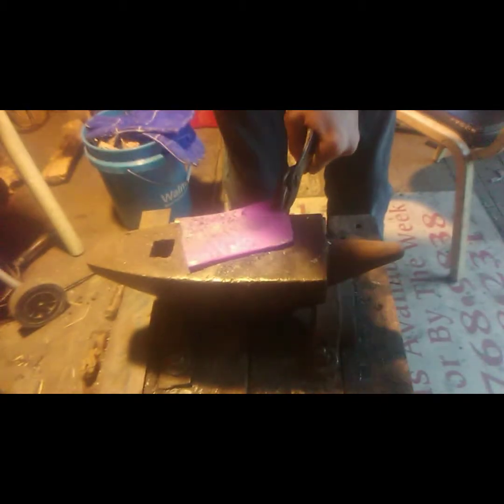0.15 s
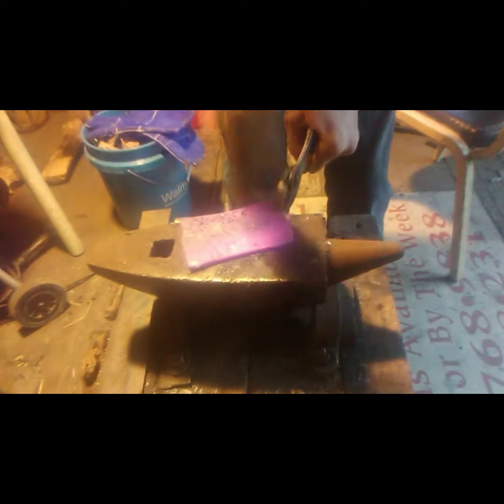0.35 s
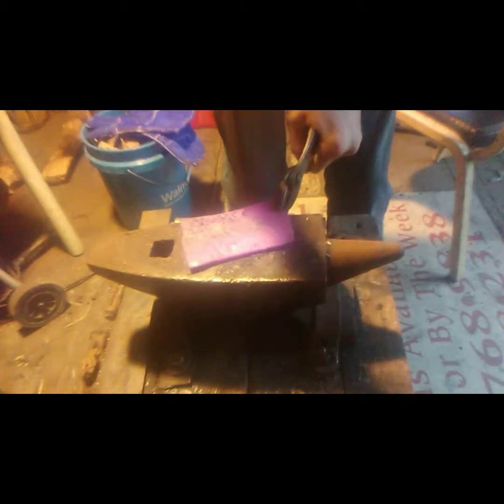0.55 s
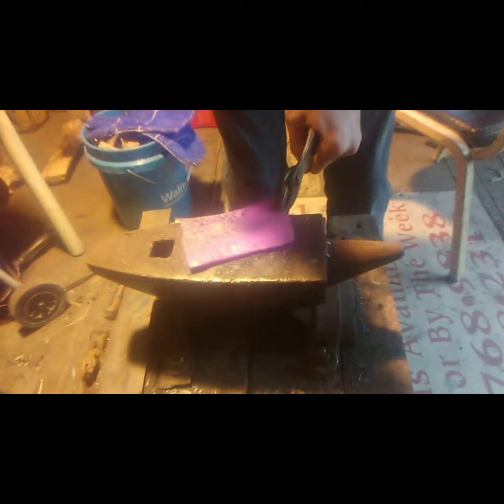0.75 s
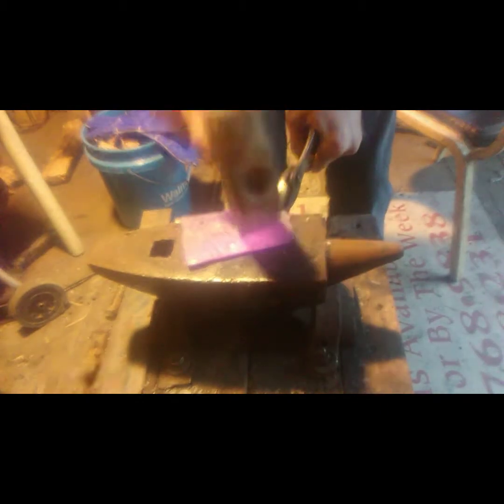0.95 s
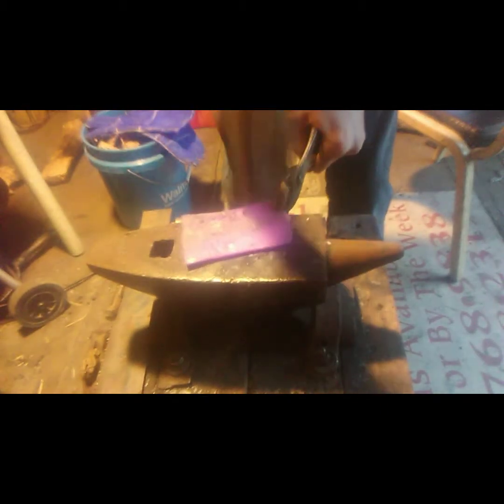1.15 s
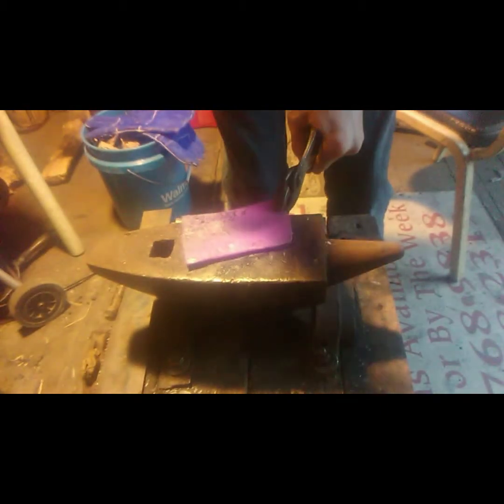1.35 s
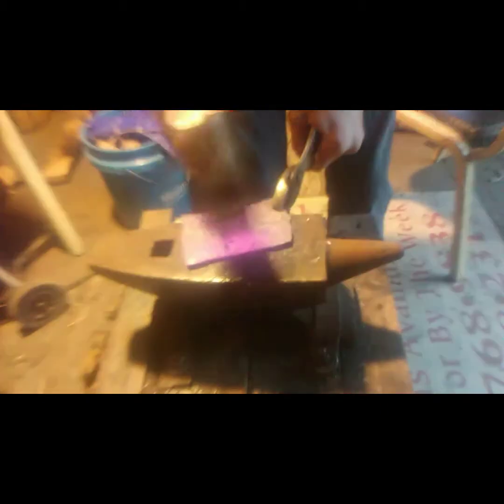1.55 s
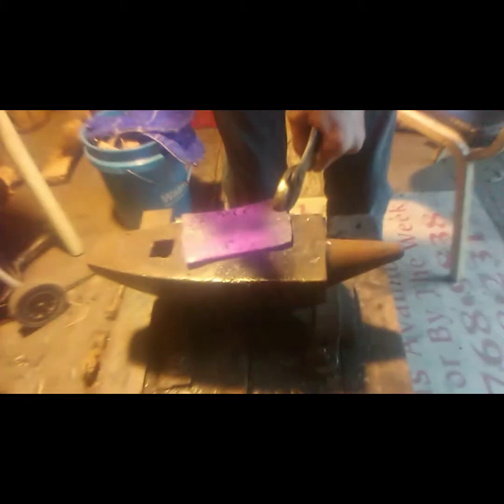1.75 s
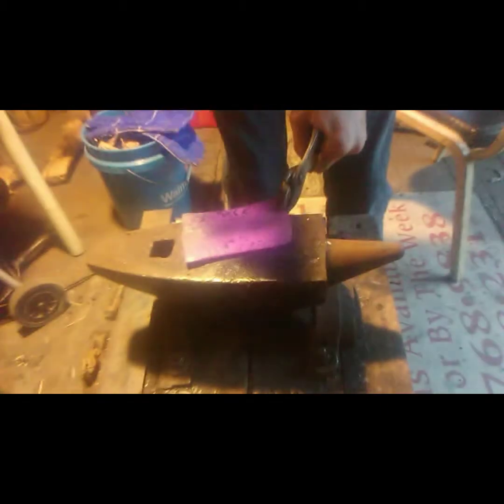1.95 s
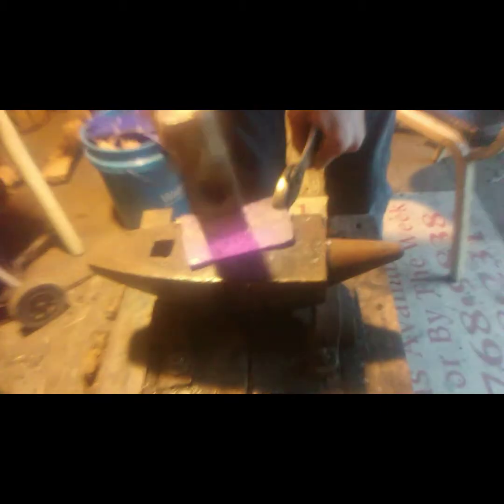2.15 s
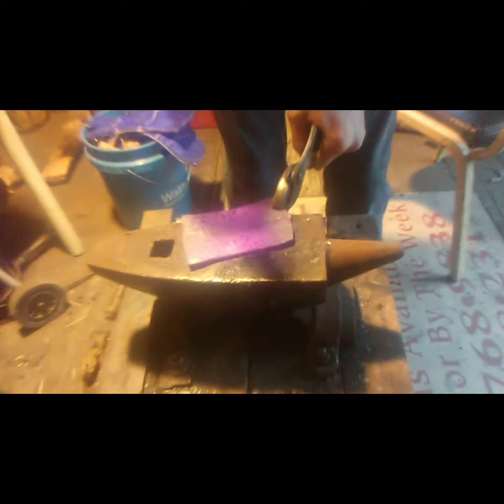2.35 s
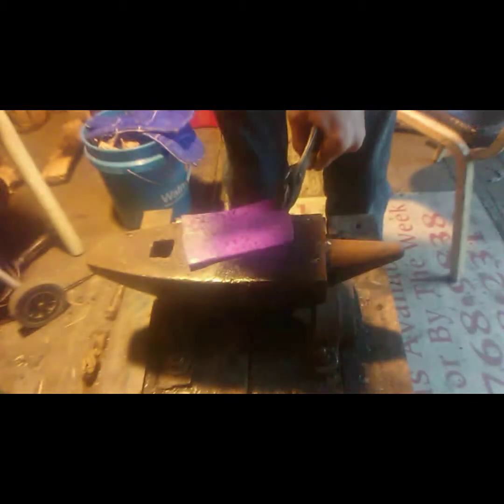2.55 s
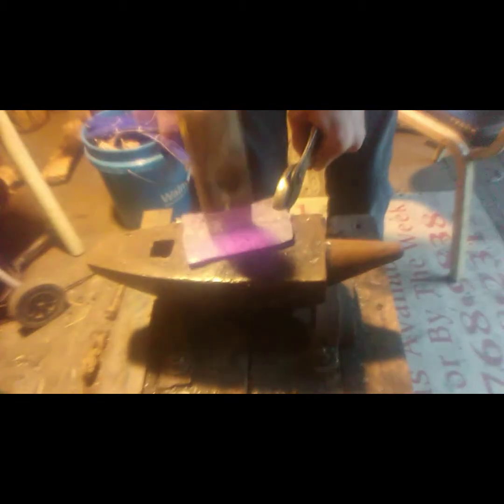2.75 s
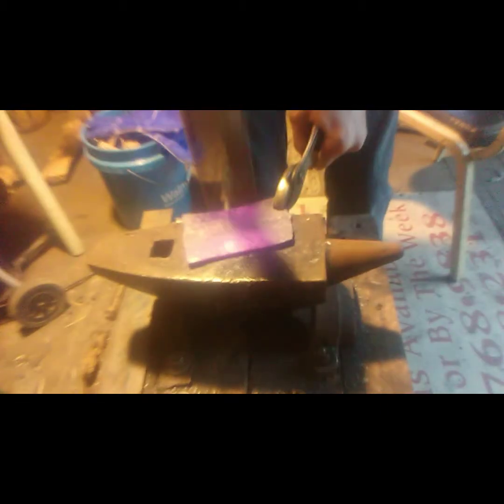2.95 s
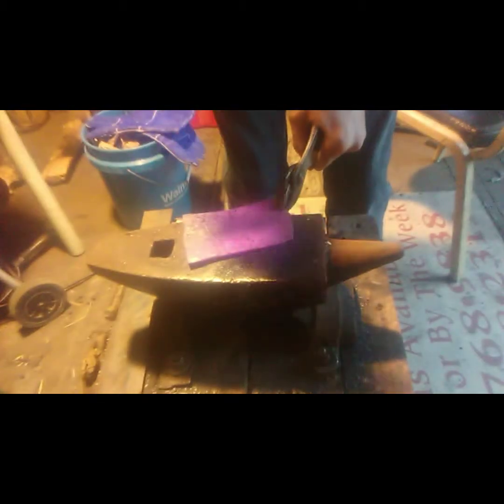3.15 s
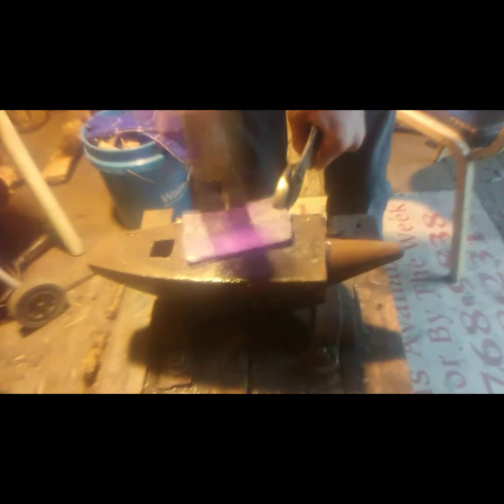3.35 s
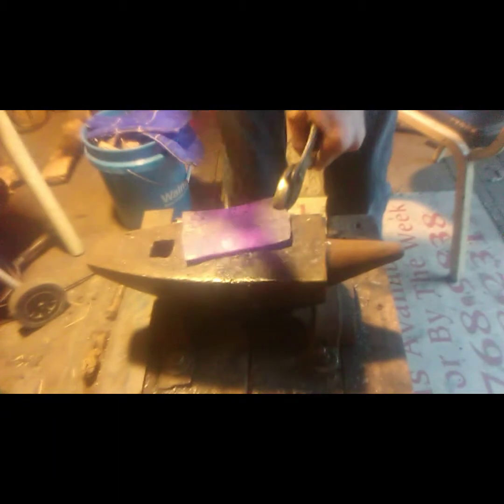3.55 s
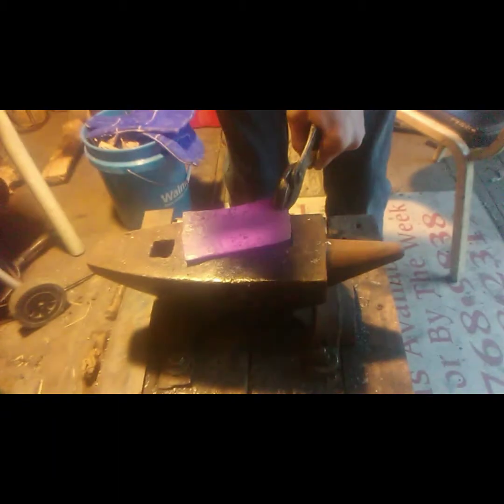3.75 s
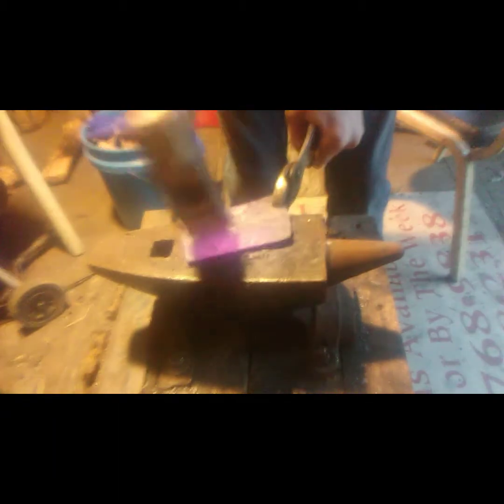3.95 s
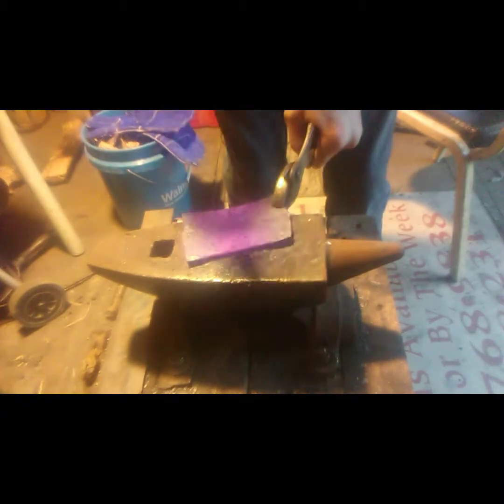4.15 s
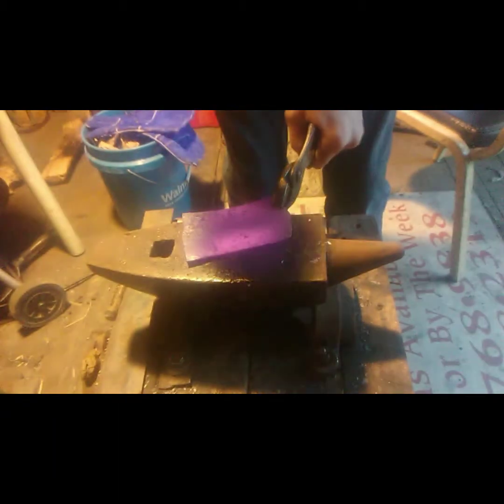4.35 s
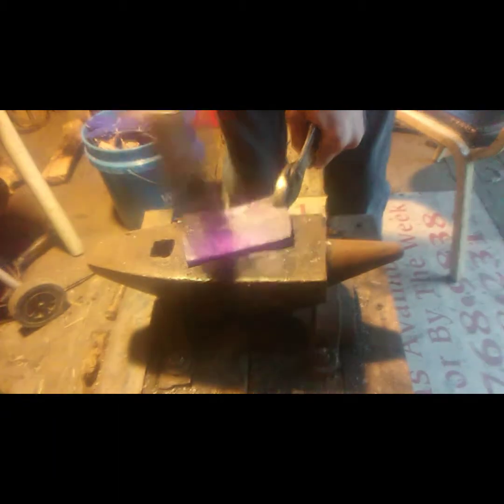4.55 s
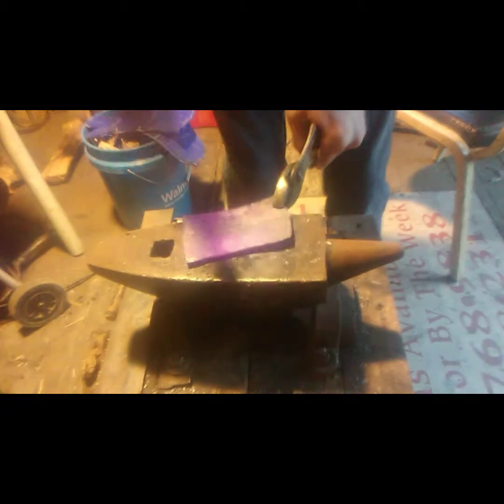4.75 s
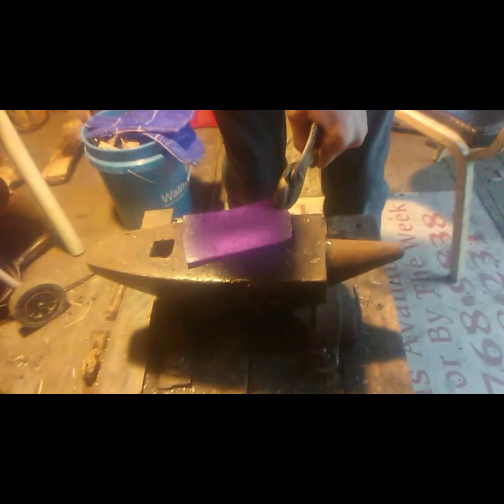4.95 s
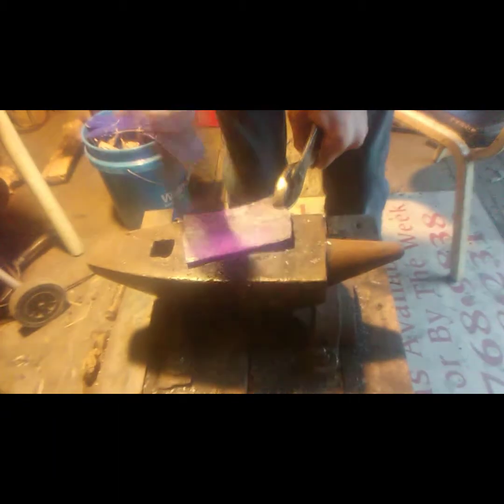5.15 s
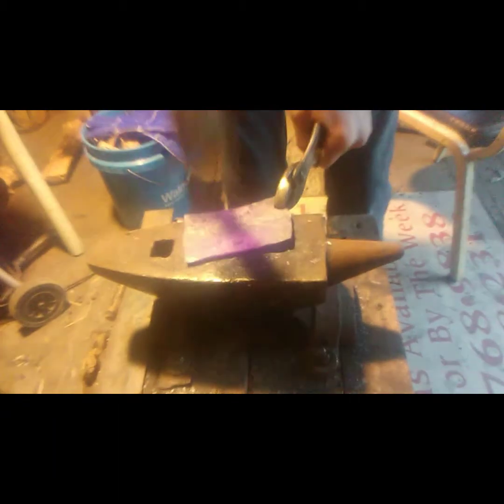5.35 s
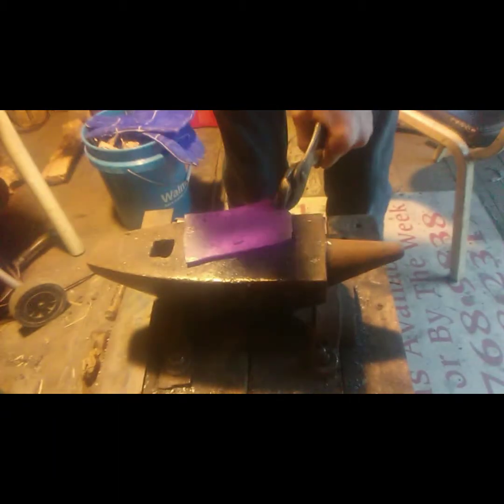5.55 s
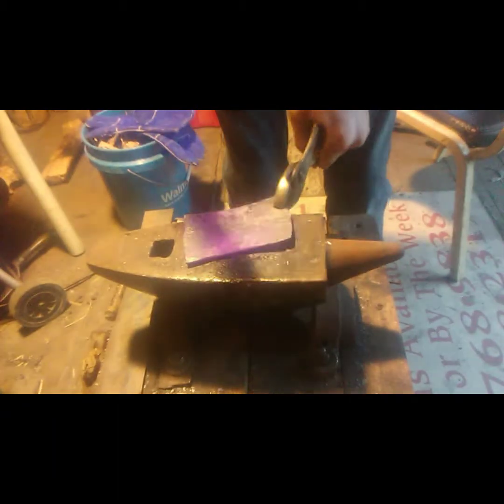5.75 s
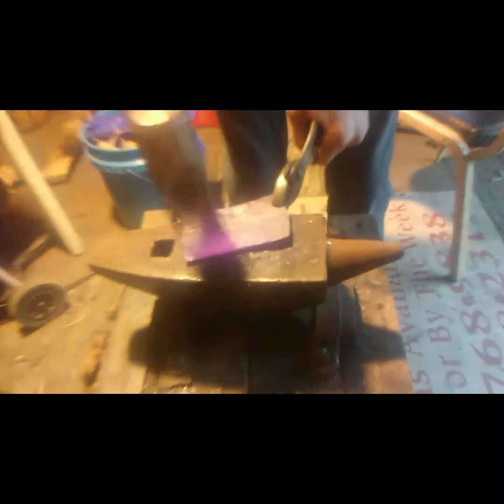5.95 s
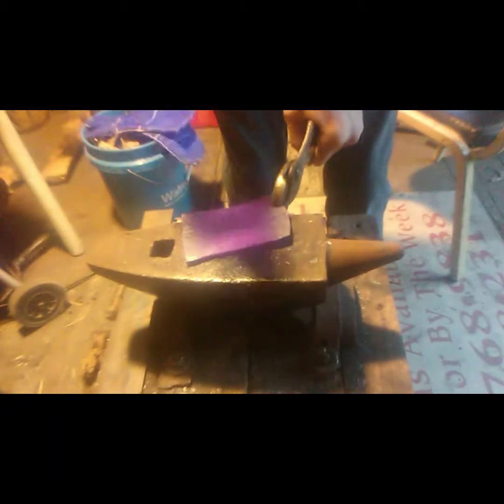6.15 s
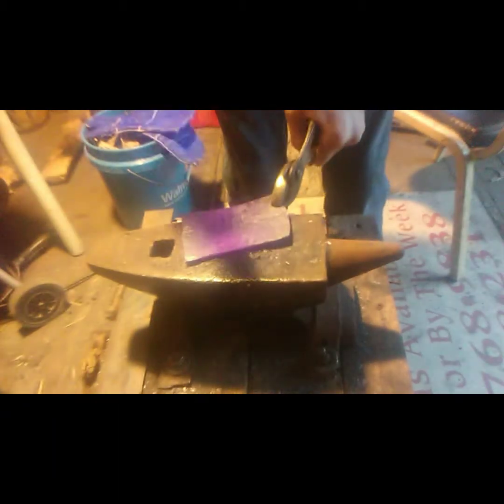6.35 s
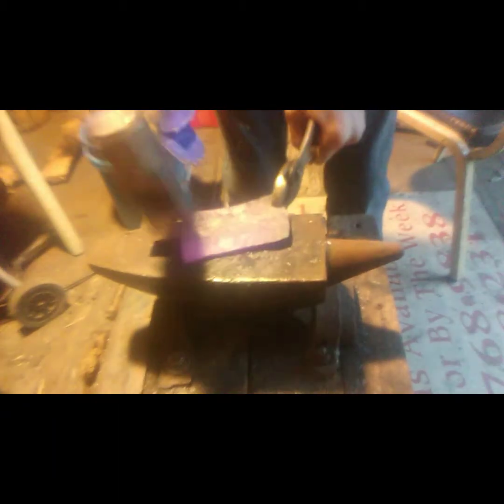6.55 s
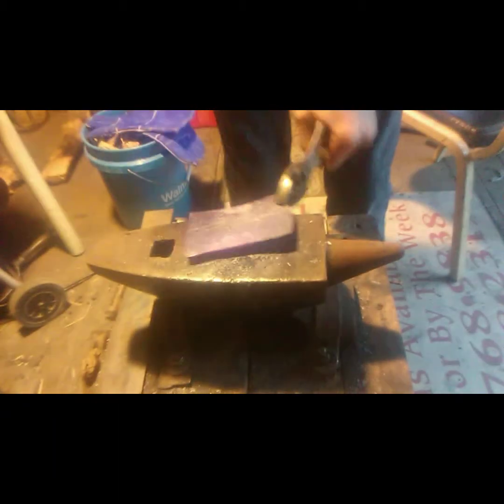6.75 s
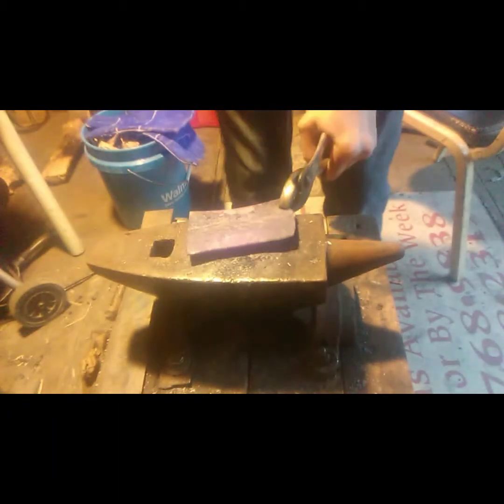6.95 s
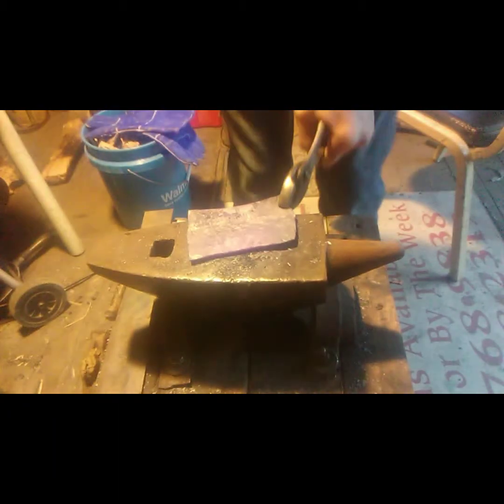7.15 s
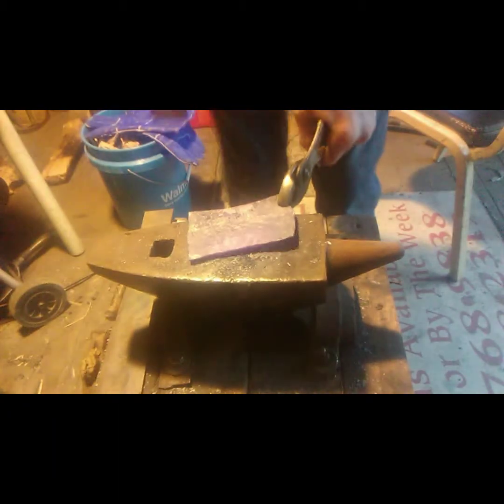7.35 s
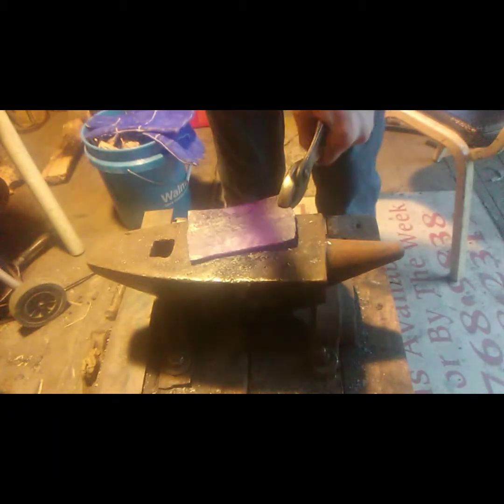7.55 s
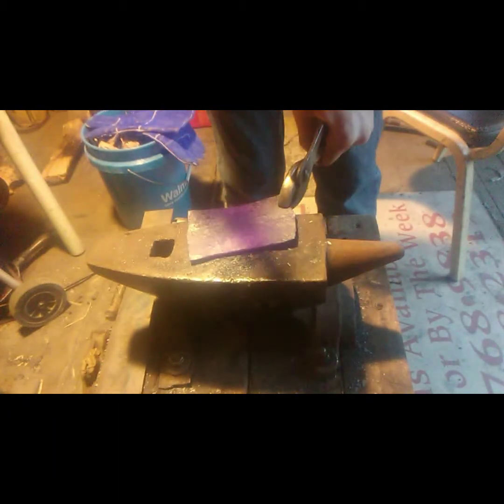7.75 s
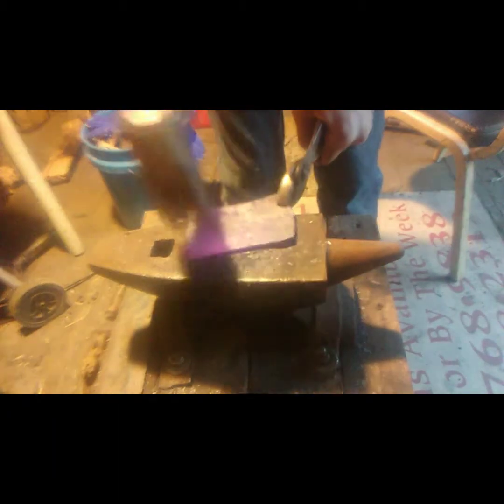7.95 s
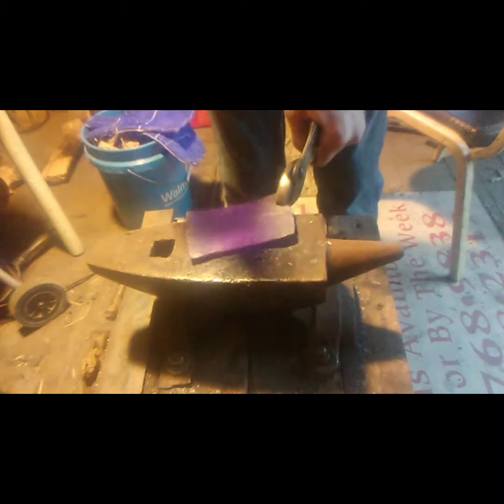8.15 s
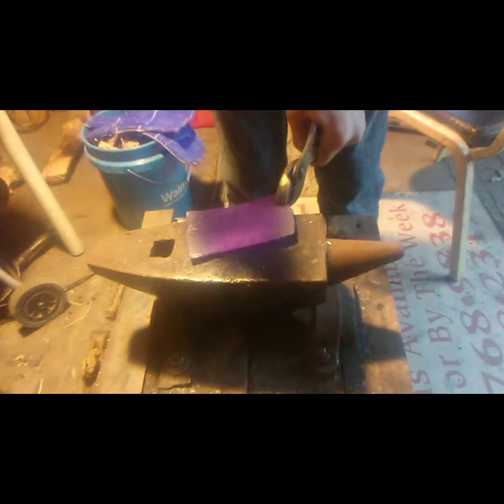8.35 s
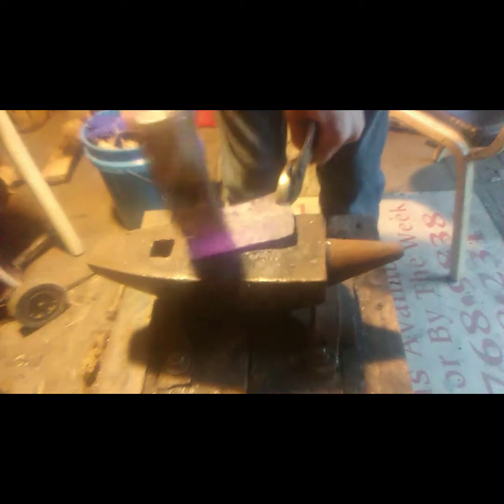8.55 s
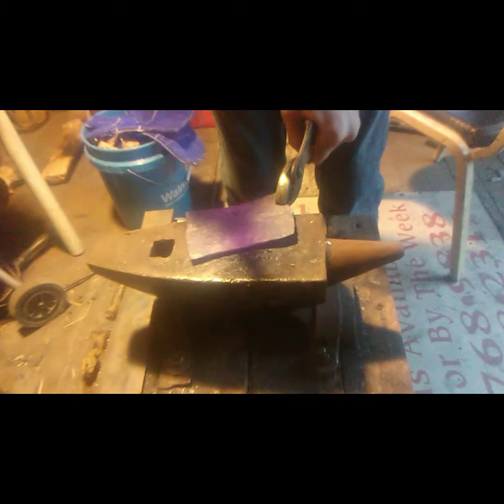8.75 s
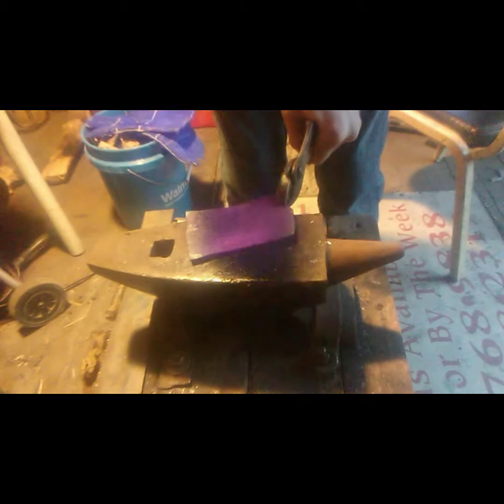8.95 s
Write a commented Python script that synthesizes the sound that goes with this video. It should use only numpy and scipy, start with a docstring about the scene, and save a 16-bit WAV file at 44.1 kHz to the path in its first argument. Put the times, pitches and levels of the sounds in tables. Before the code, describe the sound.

A hand hammer strikes a hot steel slab on an anvil about every 0.6 seconds, hard cracks with woody thuds and short rings.

```python
"""Forging hot steel in a small shop

A hand hammer works a slab on an anvil over a wooden floor: dying sines make the wood thuds and anvil
rings, short bright noise makes the cracks, and decaying noise bands make the sound scattered in the shop.
The slab chatters after some blows, narrow buzzes swell late, and one drag grinds over quiet hum and hiss.
The left microphone faces the work; a limiter and soft overload hold the blows down."""
import sys
import numpy as np
from scipy import signal
from scipy.fft import rfft, irfft
from scipy.io import wavfile
from scipy.ndimage import uniform_filter1d

SR = 44100
rng = np.random.default_rng(int(sys.argv[2]) if len(sys.argv) > 2 else 0)


def store_pcm(level_fs):
    """Save levels as 16-bit WAV."""
    pcm = np.round(np.clip(level_fs, -1, 1) * 32767).astype(np.int16)
    wavfile.write(sys.argv[1], SR, np.atleast_2d(pcm).T)


N = 400869


def gain_of(db):
    """Decibels to amplitude."""
    return 10 ** (np.asarray(db) / 20)


def read(points, hz):
    """Value of a (Hz, value) table on a log-frequency axis."""
    f, value = np.transpose(points)
    return np.interp(np.log(hz + 1), np.log(f + 1), value)


def coloured(x, db_at):
    """Filters x by a dB-of-frequency rule and evens it to rms 1."""
    length = x.shape[-1]
    hz = np.fft.rfftfreq(length, 1 / SR)
    y = irfft(rfft(x) * gain_of(db_at(hz)), length)
    return y / np.sqrt(np.mean(y ** 2))


def add(mix, s, sound):
    """Mixes a two-channel sound in at s seconds, trimming what falls outside."""
    at = round(s * SR)
    part = mix[:, max(at, 0):max(at + sound.shape[1], 0)]
    audible = sound[:, max(-at, 0):]
    part += audible[:, :part.shape[1]]


def modes(table, t, turn, rise_cycles):
    """Sums dying sines for both microphones; turn is the start of each in cycles."""
    hz, left_db, right_db, t60 = np.transpose(table)[..., None]
    dying = gain_of(-60 * t / t60) * (1 - np.exp(-t * hz / rise_cycles))
    sides = []
    for k, db in enumerate((left_db, right_db)):
        sines = np.sin(2 * np.pi * (hz * t + turn[k]))
        sides.append((gain_of(db) * dying * sines).sum(0))
    return np.array(sides)


def hammer():
    """Each blow sounds wood, anvil and shop; ring levels are listed per blow, thud and scatter vary a little."""
    # Hammer blows; the first falls before the start, so only its tail is heard.
    # Each row: start in seconds, strength in dB, then how strongly the first, second and third
    # anvil rings wake, in dB.
    blows = [(-0.19, -2.5, -29, -46, -52), (0.3275, 4.5, -33.5, -39, -46), (0.9024, 3.5, -33.5, -38, -51),
             (1.4923, 0.5, -40, -59.5, -50.5), (2.0776, 2.5, -32, -54, -40), (2.6701, 7, -20, -61, -45),
             (3.2776, 5, -28.5, -53.5, -46), (3.8847, 3, -32.5, -53.5, -29.5), (4.526, 3, -28.5, -61, -46),
             (5.1424, 3.5, -20.5, -47.5, -42.5), (5.7693, 4, -19, -48, -48.5), (6.4013, 3.5, -24, -58, -35),
             (7.7748, 1.5, -30.5, -52, -38), (8.4258, 3.5, -30.5, -63, -21), (9.0374, 3, -30, -38.5, -25)]
    thud_db, thud_follows = -1.1, 0.29  # level; dB gained per dB of strength
    crack_db = -0.5  # crack over the strength of the blow
    echo_s, echo_db = 0.086, -28.5  # the far wall returns the crack once

    t, out = np.arange(SR) / SR, np.zeros((2, N))
    thuds = wood_thuds(len(blows), t)
    tails = scatter(rattling_noise(len(blows)), t)
    fade_out = np.minimum(20 * (1 - t), 1)  # last 50 ms
    for (s, strength_db, *ring_db), thud, tail in zip(blows, thuds, tails):
        body = gain_of(thud_db + thud_follows * strength_db) * thud
        body += gain_of(strength_db) * tail
        add(out, s, (body + anvil_rings(ring_db, t)) * fade_out)
        snap = gain_of(strength_db + crack_db) * crack()
        add(out, s, snap)
        echo = gain_of(echo_db) * snap * gain_of([[-20], [0]])  # weaker on the left
        add(out, s + echo_s, echo)
    return out


def crack():
    """Steel meets steel: bright noise that rises in about a millisecond and dies within a few."""
    # Spectrum of the crack. Each row: frequency in Hz, relative left and right density in dB per Hz.
    snap_colour = [(911, -14.5, -26.5), (1830, -5, -6.5), (2850, -3, -7), (3900, -7.5, -3.5),
                   (5100, -12, -8.5), (7930, -14.5, -16.5), (14200, -16.5, -36)]
    t, (hz, *sides) = np.arange(SR // 10) / SR, np.transpose(snap_colour)
    noise = coloured(rng.standard_normal((2, len(t))),
                     lambda f: [read(np.c_[hz, db], f) for db in sides])
    fall = gain_of([[-4], [-10]] - 60 * t / .02)  # left and right dB; 60 dB in 20 ms
    return noise * fall * (1 - np.exp(-t / .0011))


def wood_thuds(count, t):
    """Stump, floor, room and boards ring as damped modes, nearly alike for every blow."""
    # Low modes of stump, floor and room.
    # Each row: frequency in Hz, relative left and right level in dB, time to lose 60 dB in seconds.
    low_modes = [(40.2, -42.5, -16.5, 0.51), (42.65, -45, -14.5, 0.83), (53.9, -31.5, -43.5, 1),
                 (72.3, -19, -12.5, 0.17), (73.93, -8, -12.5, 0.45), (78.87, -12, -10.5, 0.54),
                 (85.8, -14, -14.5, 0.45), (116.7, -19, -28, 0.57), (125.4, -6.5, -27, 0.3),
                 (145.95, -1, -22, 0.3), (177.6, -12.5, -18.5, 0.49), (192.2, -20, -25.5, 0.5),
                 (209.1, -7.5, -17.5, 0.2), (240.5, -6, -23, 0.3)]
    # Floor boards knocking higher up. Each row: frequency in Hz, relative left level in dB.
    board_modes = [(272.4, -9), (315.8, -2.5), (356.2, -4), (402.8, 0), (416.4, -2.5), (444.9, -2),
                   (480.9, 2), (523.1, 1), (552.1, -2.5), (573.6, 1.5), (592, 1), (638, -6.5), (690, -7)]
    boards_right_db, boards_cycles = -27, 69  # right under left; cycles to lose 60 dB
    varies_db = 2  # each blow wakes each mode a little more or less

    boards = [(hz, db, db + boards_right_db, boards_cycles / hz) for hz, db in board_modes]
    table = list(low_modes) + boards
    rises = [0.9] * len(low_modes) + [0.2] * len(boards)  # cycles
    push = rng.integers(0, 2, (2, len(table), 1)) / 2  # each mode starts by pushing or pulling
    wood = np.array([modes([row], t, push[:, [k]], rises[k]) for k, row in enumerate(table)])
    wake = gain_of(varies_db * rng.standard_normal((count, len(wood))))
    return np.tensordot(wake, wood, axes=1)


def anvil_rings(ring_db, t):
    """Anvil modes ring at the blow's listed levels, each beating against a weaker neighbour."""
    # Ringing modes of the anvil. Each row: frequency in Hz, left and right dB added to the blow's
    # ring level, time to lose 60 dB in seconds.
    ring_modes = [(5389, 24, 7, .15), (8971, 20, 11, .15), (11890, 7, -16, .12), (4172, 18, 5, .12)]
    twin_ratio, twin_db = 1.003, -9  # frequency and level of the neighbour
    long_ring = (1362, -69, -80, 2.5)  # slow bending of the body: Hz, left dB, right dB, t60 in seconds

    wake_db = [*ring_db, ring_db[1]]  # the fourth ring wakes with the second
    rung = [(hz, left + wake, right + wake, t60)
            for (hz, left, right, t60), wake in zip(ring_modes, wake_db)]
    rung += [(hz * twin_ratio, left + twin_db, right + twin_db, t60) for hz, left, right, t60 in rung]
    turn = rng.random((2, len(rung), 1))
    anvil = modes([long_ring], t, turn[:, :1], 15)
    add(anvil, 0, modes(rung, t[:SR // 3], turn, 47))
    return anvil


def rattling_noise(count):
    """Noise common to all blows plus fresh noise whose uneven grain is the slab rattling."""
    common = rng.standard_normal((2, SR))
    fresh = rng.standard_normal((count, 2, SR))
    grain = uniform_filter1d(rng.standard_normal((count, 1, SR)), size=150)
    return 0.64 * common + 0.76 * gain_of(19 * grain) * fresh


def scatter(noise, t):
    """Sound scattered in the shop: overlapping noise bands with a quick fall and a faint late tail."""
    # Decay of the scattered sound by band. Each row: centre in Hz, relative left and right level in dB,
    # quick 60 dB time in seconds, late left and right level in dB, late 60 dB time in seconds.
    bands = [(147, -12.5, -31, 0.4, -42.5, -54.5, 1.3), (238, -13.5, -30.5, 0.35, -55.5, -66, 1.2),
             (300, -6.5, -23.5, 0.1, -53.5, -69, 0.7), (430, -6.5, -21, 0.08, -54.5, -67, 1.1),
             (754, -6, -33.5, 0.18, -53.5, -70.5, 0.43), (1415, -7.5, -36, 0.12, -61.5, -74.5, 0.71),
             (1980, -7, -32, 0.12, -60, -72.5, 0.5), (2800, -12, -35, 0.11, -58.5, -69.5, 0.37),
             (4100, -14, -32, .13, -63, -73.5, 0.17), (6400, -19, -39.5, .14, -65.5, -75, .3),
             (9700, -22, -49, 0.13, -70.5, -75.5, .3), (14500, -23.5, -58.5, 0.17, -76, -81.5, .3)]
    z, hz = rfft(noise), np.fft.rfftfreq(len(t), 1 / SR)
    out, centres = np.zeros_like(noise), [row[0] for row in bands]
    for share, (f, left_db, right_db, t60, *late_db, late_t60) in zip(np.eye(len(bands)), bands):
        weight = read(list(zip(centres, share)), hz)  # 1 at its own centre, 0 at the others
        band = irfft(z * weight * (hz > 90), len(t))
        quick = gain_of([[left_db], [right_db]] - 60 * t / t60)
        late = gain_of(np.c_[late_db] - 60 * t / late_t60)
        rise = 1 - np.exp(-t * f / 3.0)  # bass builds up over its first cycles
        colour = gain_of(2.2 * rng.standard_normal((len(noise), 1, 1)))  # random level for every blow
        out += band / band.std() * (quick + late) * rise * colour
    return out


def chatter():
    """The slab drops back on the face with small cracks; narrow noise swells late in some tails."""
    # Small cracks of the slab. Each row: start in seconds, level in dB.
    slab_drops = [(1.5994, -36), (1.6237, -39.5), (2.802, -21), (2.8245, -31.5), (4.0174, -44), (5.05, -47),
                  (5.199, -24), (5.273, -32), (6.535, -36)]
    # Late buzzes, likely the tongs. Each row: start in seconds, level in dB ahead of the swell,
    # centre in Hz.
    tong_buzzes = [(.45, -48.5, 1600), (.48, -61, 950), (1.02, -49, 1530), (2.82, -48.5, 2800),
                   (2.879, -59, 1770), (4.0, -57, 2420), (6.519, -54, 1090), (6.53, -57, 2800),
                   (7.9, -53.5, 770), (8.52, -54, 2400), (8.58, -58, 1520)]
    drop_left_db, buzz_right_db = -15.5, -18
    swell_cycles = 52  # cycles to the peak, so low buzzes swell more slowly

    t, out = np.arange(SR // 3) / SR, np.zeros((2, N))
    for s, db in slab_drops:
        add(out, s, gain_of(db) * crack() * gain_of([[drop_left_db], [0]]))
    for s, db, hz in tong_buzzes:
        buzz = coloured(rng.standard_normal((2, len(t))),
                        lambda f: -15 * np.log10(1 + ((f - hz) / (.05 * hz)) ** 2))
        swell = t * hz / swell_cycles
        envelope = swell * np.exp(-swell)
        add(out, s, gain_of(db) * envelope * buzz * gain_of([[0], [buzz_right_db]]))
    return out


def drag():
    """Scale grinds under the slab: hiss with sharp grains, a light touch, then one short pull."""
    # Spectrum of the grinding scale. Each row: frequency in Hz, relative density in dB per Hz.
    scale_colour = [(470, -45), (800, -19), (870, -11), (1260, -15), (4430, -3.5), (11000, -16),
                    (14000, -33)]
    start, pull, full, let_go = 7.02, 7.125, 7.165, 7.22  # s: touch, pull begins, full, let go
    touch_db, full_db, right_db = -75, -58, -25  # light touch, full pull; right under left
    fade_db = 690  # dB per second after letting go

    t = np.arange(start, start + .35, 1 / SR)
    db = np.interp(t, [pull, full], [touch_db, full_db])
    db -= fade_db * np.maximum(t - let_go, 0)
    sharp = rng.random(len(t)) < 250 / SR  # about 250 grains a second
    grains = rng.standard_normal((2, len(t))) * (1 + 6 * sharp)
    grind = coloured(grains, lambda f: read(scale_colour, f))
    onset = np.minimum((t - start) / .015, 1)
    out = np.zeros((2, N))
    add(out, start, onset * gain_of(db + [[0], [right_db]]) * grind)
    return out


def air():
    """Shop hum and microphone hiss: steady coloured noise, unrelated in the two microphones."""
    # Spectrum of hum and hiss. Each row: frequency in Hz, relative density in dB per Hz.
    hum_hiss = [(18, -38), (30, -5), (69, 1.5), (154, -10), (394, -9.5), (437, -9), (837, -7),
                (1240, -16.5), (3320, -22), (15000, -27.5)]
    # Balance of the microphones. Each row: frequency in Hz, left over right in dB.
    left_over_right = [(60, 9), (240, 11), (950, 13), (3770, -1.5), (15000, 1.5)]
    level_db = -73
    side = np.array([[.5], [-.5]])  # half the balance to each microphone
    noise = rng.standard_normal((2, N))
    return gain_of(level_db) * coloured(
        noise, lambda f: read(hum_hiss, f) + side * read(left_over_right, f))


def scene():
    """All sources at the two microphones."""
    return hammer() + chatter() + drag() + air()


def record(dry):
    """A quick limiter and a soft overload hold the blows down; coupling capacitor, treble loss, band limit."""
    window = 132  # samples, 3 ms
    level_db = 20 * np.log10(uniform_filter1d(abs(dry), size=window) + 1e-9)
    fall = np.arange(N) * 900.0 / SR  # recovery in dB a second
    held_level_db = np.maximum.accumulate(level_db + fall, axis=1) - fall
    over_db = np.maximum(held_level_db + 8, 0)  # threshold -8 dB
    # The limiter reacts late, so the front of a blow slips through.
    late_over_db = uniform_filter1d(over_db, size=window, origin=60)
    held = dry / gain_of(0.81 * late_over_db)
    ceiling, knee = .92, 3.
    clipped = held / (1 + abs(held / ceiling) ** knee) ** (1 / knee)
    coupled = signal.lfilter(*signal.butter(1, 32, "high", fs=SR), clipped)
    shelf = signal.firwin2(255, [0, 14200, 14700, SR / 2], [1, 1, .05, .05], fs=SR)
    edge = signal.firwin(511, 15900, window=("kaiser", 9), fs=SR)
    treble_cut = np.convolve(shelf, edge)[None]
    return np.clip(signal.oaconvolve(coupled, treble_cut, "same", axes=1), -1, 1)


dry = scene()
out = record(dry)
store_pcm(out)
```